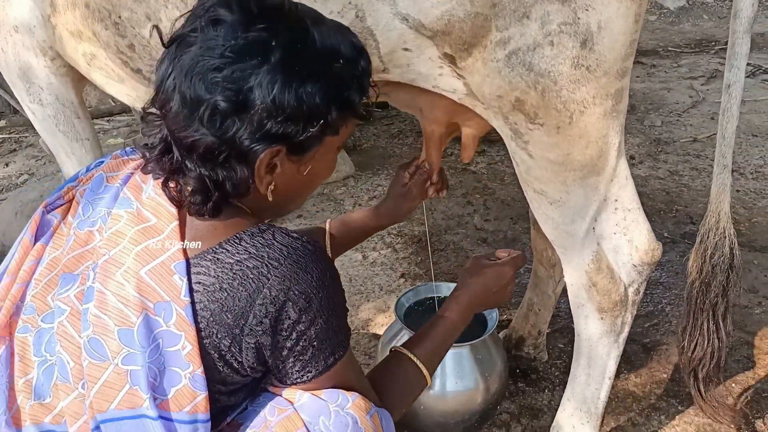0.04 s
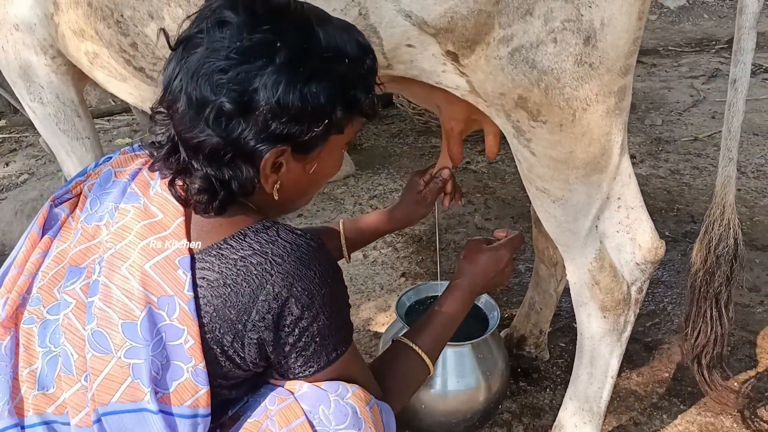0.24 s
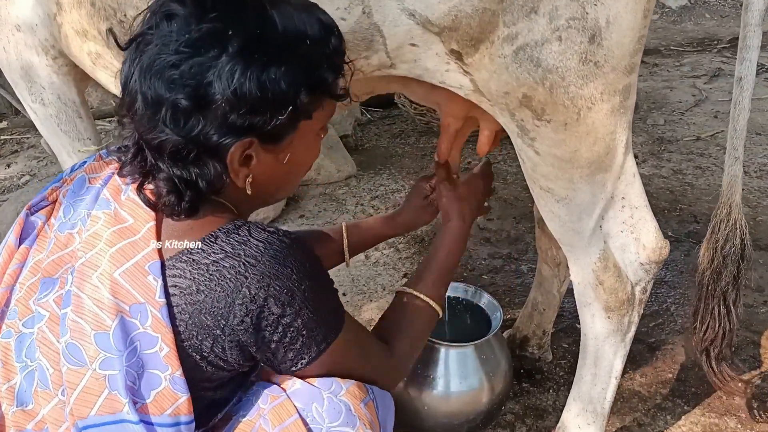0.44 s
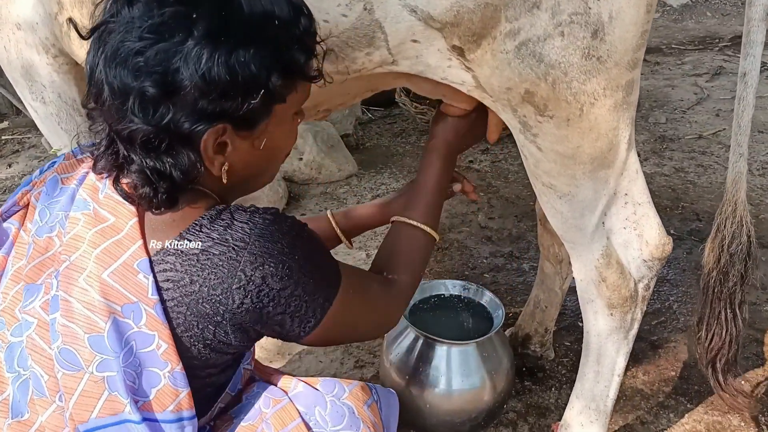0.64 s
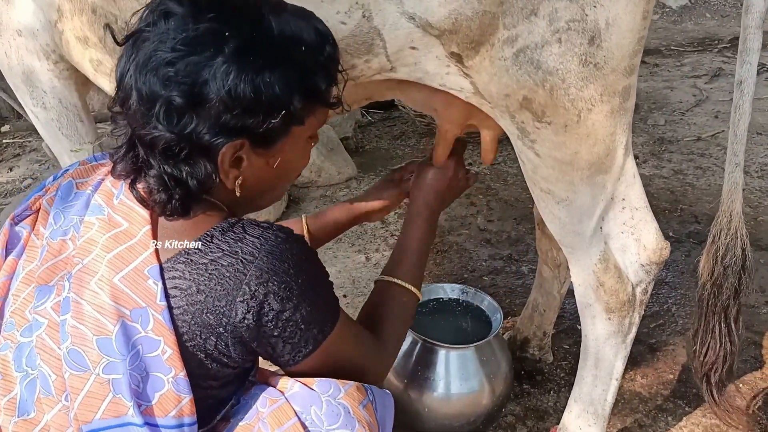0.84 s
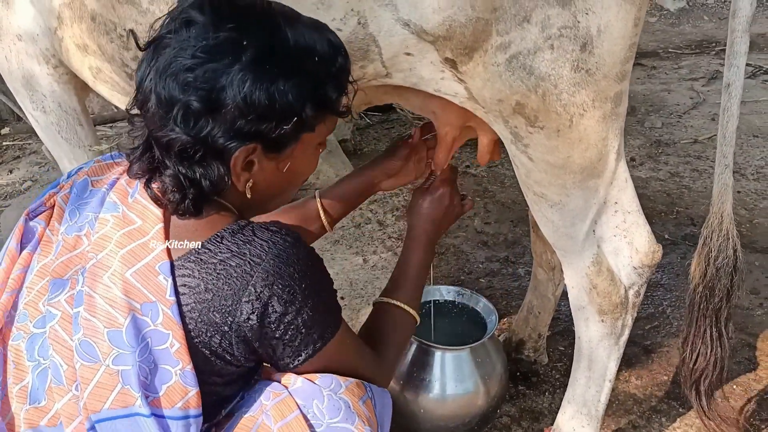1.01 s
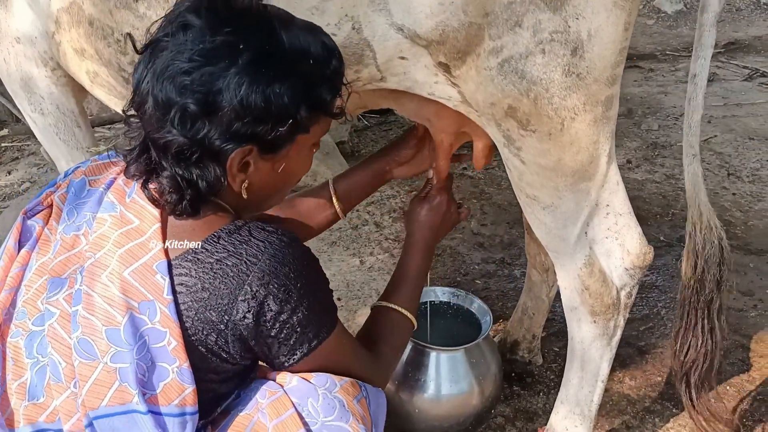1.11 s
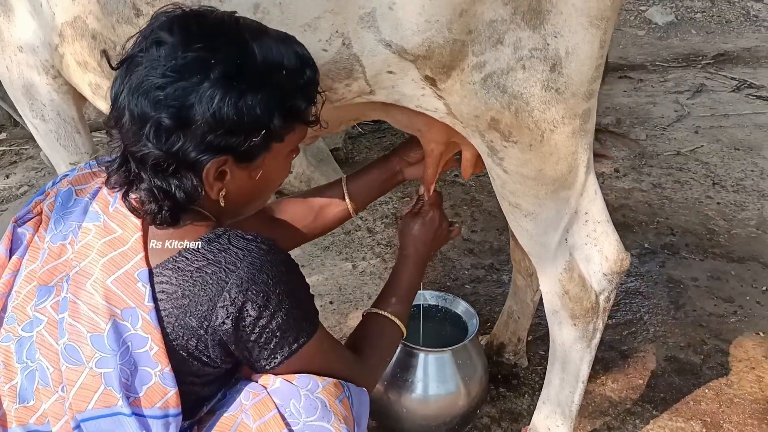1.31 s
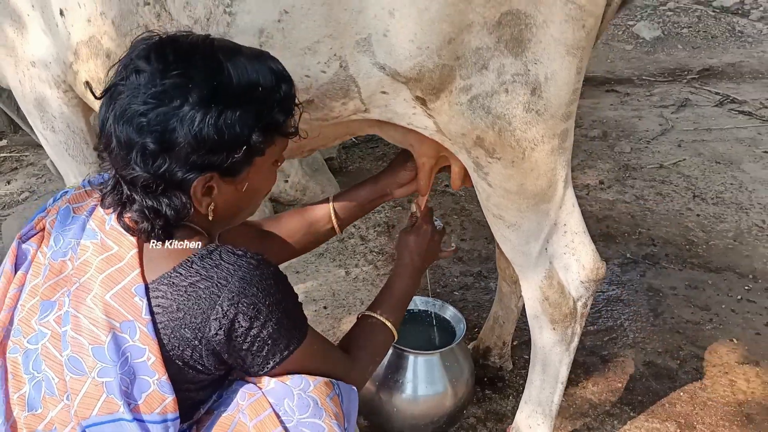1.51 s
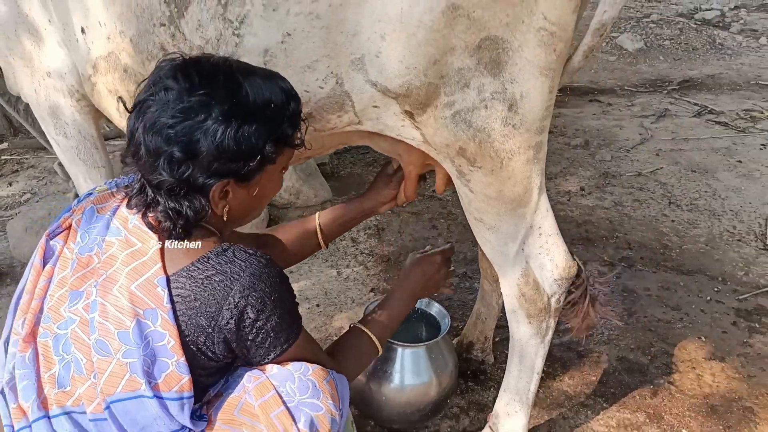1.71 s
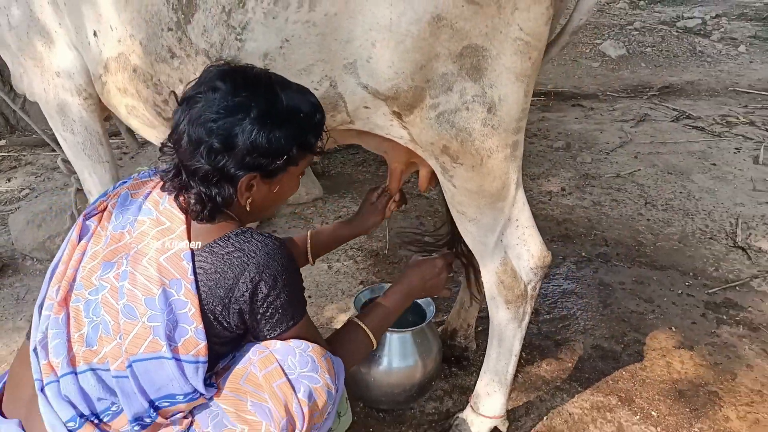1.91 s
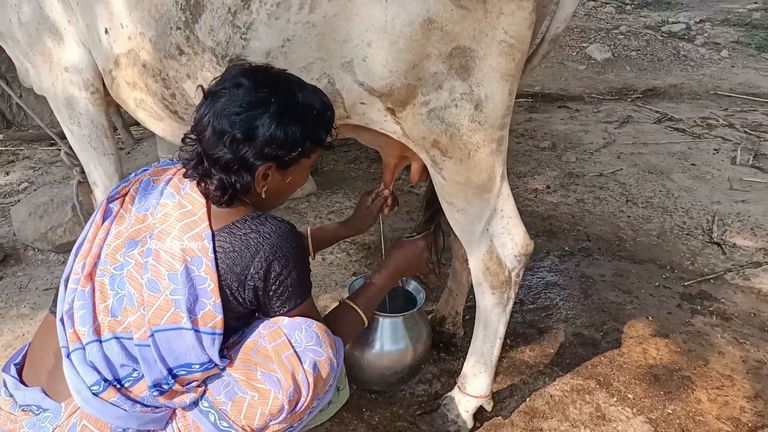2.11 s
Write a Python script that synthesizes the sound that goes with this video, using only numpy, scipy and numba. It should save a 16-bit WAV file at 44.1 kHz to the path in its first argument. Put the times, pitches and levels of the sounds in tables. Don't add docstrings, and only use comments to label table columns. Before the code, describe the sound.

Close stereo phone pickup outdoors: two bright metallic milk squirts with froth, splashing drops and a hollow hum, the first stronger. Bird whistles fill the gap and continue; faint chirps, soft wind and a quiet hush lie below.

```python
import sys
import numpy as np
from scipy import signal
from scipy.fft import rfft, irfft
from scipy.io import wavfile
from scipy.ndimage import uniform_filter1d
from numba import njit

SR = 44100
rng = np.random.default_rng(int(sys.argv[2]) if len(sys.argv) > 2 else 0)


def inscribe(sig):
    pcm = np.round(np.clip(np.atleast_2d(sig).T, -1, 1) * 32767)
    wavfile.write(sys.argv[1], SR, pcm.astype(np.int16))


def elevation(decibels):
    levels = np.asarray(decibels, float)
    return 10 ** (levels / 20)


N = 94815
LEFT_RIGHT = np.array([[1], [-1]])
JET_PAN_DB = 2.5


def unit(x):
    return x / np.sqrt(np.mean(x ** 2))


@njit
def svf(x, hz, width):
    y, b, l = np.empty(len(x)), 0., 0.
    g, k = np.tan(np.pi * hz / SR), width / hz
    for i in range(len(x)):
        v = (b + g * (x[i] - l)) / (1 + g * (g + k))
        b, l, y[i] = 2 * v - b, l + 2 * g * v, k * v
    return y


def walk(rate):
    k = int(SR / rate)
    steps = np.repeat(rng.standard_normal(N // k + 1), k)
    return unit(uniform_filter1d(uniform_filter1d(steps, k), k)[:N])


def column(table, index, off=-120.):
    a = np.array(table)
    return np.interp(np.arange(N) / SR, a[:, 0], a[:, index], left=off, right=off)


def over_pitch(table, **ends):
    a, f = np.array(table), np.arange(N // 2 + 1) * SR / N + 1
    return np.interp(np.log(f), np.log(a[:, 0]), a[:, 1], **ends)


def coloured(shape):
    return unit(irfft(rfft(rng.standard_normal(N)) * elevation(over_pitch(shape, left=-60)), N))


def glide(hz):
    return np.sin(2 * np.pi * np.cumsum(hz) / SR)


def pan(x, db):
    return x * elevation(.5 * LEFT_RIGHT * db)


def ring(drops, hz, width):
    hz, width = float(hz), 1.4 * width
    mid, side = (unit(svf(svf(d, hz, width), hz, width)) for d in drops)
    return mid + min(hz / 3500, .58) * side * LEFT_RIGHT


# t/s, level/dB, drop fineness/octaves above 1 kHz, spray/dB
SQUIRT_1 = [
    (.134, -60.5, 1.74, -0.5),
    (.142, -62.5, 2.534, 0),
    (.26, -49, 1.703, -6.5),
    (.37, -46, 1.425, -8),
    (.455, -47, 2.027, -1),
    (.463, -37, 1.052, -5),
    (.51, -46, 2.287, 1),
    (.655, -45, 2.568, 0.5),
    (.765, -65.5, 1.9, -1),
]
SQUIRT_2 = [
    (1.12, -83.5, 1.8, -1.5),
    (1.13, -59.5, 2.55, -3),
    (1.19, -57.5, 1.48, 5),
    (1.221, -41, 1.77, -2),
    (1.238, -52.5, 1.76, 0.5),
    (1.311, -53.5, 2.676, 9),
    (1.431, -50, 1.64, -1.5),
    (1.627, -59.5, 1.854, 1.5),
    (1.74, -75, 1.91, 5.5),
]
SQUIRT_3 = [
    (2.11, -89.5, 1.4, -10.5),
    (2.132, -61.5, 0.44, -0.5),
    (2.15, -59.5, 3.57, 5),
]
# f/Hz, width/Hz, level/dB
POT = [(1976, 258, -6.5), (2467, 442, -3.5), (2745.7, 398, -4.5), (3041, 384, 0.5), (3513.5, 376, -1.5),
       (4100, 346, -3), (4410, 346, -6), (5256, 416, -1), (6451, 1265, 2)]
# f/Hz, width/Hz, level/dB
SPRAY = [(8197, 895, -6.5), (8984, 1670, 1.5), (10150, 3460, 1.5), (11875, 2270, 6), (14310, 3900, 3.5)]


def jet():
    squirts = SQUIRT_1, SQUIRT_2, SQUIRT_3
    level = np.max([column(s, index=1) for s in squirts], axis=0)
    fine = sum(column(s, index=2, off=0.) for s in squirts)
    spray = sum(column(s, index=3, off=0.) for s in squirts)
    drops_per_s, scatter_db = 5000, 2.5
    lands = rng.random(N) < drops_per_s / SR
    size = lands * elevation(scatter_db * np.minimum(rng.exponential(size=N), 5))
    drops = size * np.sign(rng.standard_normal((2, N)))
    surge = 1.8 * walk(46.04)

    body, power = 0, 0
    for k, (hz, width, db) in enumerate(POT):
        octaves_off = np.log2(hz / 1000) - fine
        weight = elevation(db) * (np.exp(-.5 * (octaves_off / .7) ** 2) + elevation(-15))
        flutter = elevation(3 * walk(59.79) + 1.5 * walk(11.53))
        body = body + (-1) ** k * weight * flutter * ring(drops, hz, width)
        power = power + weight ** 2
    body = body / np.sqrt(power)

    hiss, hiss_surge = 0, elevation(1.65 * walk(49.906))
    for hz, width, db in SPRAY:
        flutter = elevation(db + 3.23 * walk(59.81) + 1.74 * walk(14))
        mist = rng.standard_normal((2, N)) * (1 + 1.02 * unit(size))
        hiss = hiss + flutter * ring(mist, hz, width)
    hiss = hiss_surge * unit(hiss)
    return pan(elevation(level + surge - 3) * (body + elevation(spray) * hiss), JET_PAN_DB)


# t/s, level/dB
FROTH_1 = [(.135, -73.5), (.18, -60.5), (.24, -52.5), (.3, -52), (.45, -56), (.47, -49), (.52, -58),
           (.63, -62.5), (.72, -97)]
FROTH_2 = [(1.148, -71), (1.18, -57), (1.222, -42.5), (1.243, -61), (1.256, -46.5), (1.391, -46),
           (1.431, -44), (1.634, -58), (1.696, -90)]
FROTH_3 = [(2.115, -84.5), (2.133, -63), (2.15, -61)]
# f/Hz, width/Hz, level/dB
CAVITY = [(820, 160, -8), (1070, 240, 0), (1300, 200, -5), (1520, 220, 0), (1720, 160, -4)]


def froth():
    level = np.max([column(f, index=1) for f in (FROTH_1, FROTH_2, FROTH_3)], axis=0)
    bubbles_per_s, scatter_db = 1400, 3
    air = 0
    for hz, width, db in CAVITY:
        flutter = elevation(db + 1.503 * walk(29.727))
        bursts = rng.random(N) < bubbles_per_s / SR
        size = elevation(scatter_db * np.tanh(rng.exponential(size=N) / 2) * 2)
        pops = bursts * size * rng.standard_normal((2, N))
        air = air + flutter * ring(pops, hz, width)
    return pan(elevation(level) * unit(air), JET_PAN_DB + .3)


# t/s, peak level/dB, ring f/Hz, crack level/dB, length/ms
SPLASH = [(0.221, -26.5, 3015, -6.5, 2.21), (0.2196, -36.5, 5010, -4, 3.42),
          (0.2207, -36, 1194, -4.5, 2.19), (0.271, -36.5, 3830, -31, 3.53), (0.319, -42, 2860, -26.5, 10.4),
          (0.374, -35, 3750, -16.5, 5.7), (0.458, -44, 2700, -20.5, 3.7), (0.46, -35.5, 4400, -13.5, 5),
          (0.476, -36, 2770, -20, 16.8), (0.496, -35, 3700, -13, 3.03), (.6625, -34, 6214, -2, 2.15),
          (0.7403, -32, 3234, 7, 1.6), (1.206, -40, 6000, -8, 3.06), (1.212, -33, 2640, -19, 5.2),
          (1.2221, -24, 900, 3, 1.08), (1.354, -44.5, 3180, -27, 7.5), (.282, -32.5, 1129, -11.5, 4.3),
          (0.2, -43, 1048, -15.5, 3.74), (1.254, -36, 1082, 6, 3), (1.2994, -40, 1497, -22.5, 3.6),
          (1.6, -38, 1450, -19.5, 1.67), (1.4087, -37.5, 1497, -9, 6.05), (1.4172, -41.5, 1090, -20, 7.1),
          (1.4631, -35.5, 1370, -26, 5.9), (1.1867, -45.5, 1000, 10.5, 3.4), (1.5858, -53.5, 3500, 15, 3),
          (1.318, -33, 1493, -13.5, 3.7), (0.85, -53.5, 4400, -0.5, 2.75), (.566, -41.5, 4100, -1, 2.5),
          (0.55, -35.5, 5680, 1.5, 2.33), (1.704, -46, 5824, -5.5, 4.74), (1.6, -55, 1070, 11, 4.8)]


def splashes():
    size = 2048
    out, t = np.zeros((2, N + size)), np.arange(size) / SR
    for s, db, hz, crack_db, ms in SPLASH:
        noise = rng.standard_normal((2, size))
        both = noise[0] + .5 * noise[1] * LEFT_RIGHT
        hz = float(hz)
        tone = np.array([unit(svf(svf(n, hz, hz / 4.5), hz, hz / 2)) for n in both])
        middle = np.array([svf(n, 290.0, 1730.0) for n in both])
        crack = (both - middle) * np.exp(-t / .0015)
        fade = np.exp(-t * 1000 / ms) * (1 - np.exp(-t / .00029))
        i = int(s * SR)
        out[:, i:i + size] += elevation(db + 1) * fade * (tone + elevation(crack_db) * crack)
    return pan(out[:, :N], JET_PAN_DB)


def wall(x):
    t60_s, tail_gain = .06, elevation(-5)
    age = np.arange(SR // 10) / SR
    tail = rng.standard_normal(len(age)) * elevation(-60 * age / t60_s)
    tail = tail / np.sqrt(np.sum(tail ** 2))
    ringing = signal.fftconvolve(x, tail[None], axes=1)[:, :N]
    return (x + tail_gain * ringing) / np.hypot(1, tail_gain)


# t/s, hum level/dB
HUM_1 = [(.26, -74), (.35, -46), (.39, -61), (.435, -45.5), (.48, -54.5), (.52, -46), (.62, -49.5),
         (.715, -52), (.79, -74)]
HUM_2 = [(1.32, -71.5), (1.36, -51.5), (1.41, -48), (1.52, -46), (1.56, -52), (1.578, -41.5),
         (1.635, -46.5), (1.67, -53.5), (1.76, -75.5)]


def neck():
    hz, width = 300.72, 35.0
    noise = rng.standard_normal((2, N))
    tone = np.sqrt(2) * glide(hz * (1 + .035 * walk(40.15))) * elevation(1.8 * walk(50))
    rough = elevation(-4) * unit(svf(noise[0], hz, width))
    skirt = elevation(-18.5) * unit(svf(noise[1], 300.0, 115.0))
    side = .124 * unit(svf(noise[1], 296.0, 140.0)) * LEFT_RIGHT
    level = np.maximum(column(HUM_1, index=1), column(HUM_2, index=1))
    return elevation(level) * (tone + rough + skirt + side)


# t/s, peak level/dB, f/Hz
KNOCKS = [(.136, -52.5, 304.3), (.228, -46, 442), (1.252, -54, 325.8), (.53, -48, 444.9), (.56, -53, 191.8),
          (.65, -54, 624), (.258, -50, 590.4), (0.282, -54, 307.4), (.455, -54.5, 780), (1.195, -55, 518.5),
          (1.225, -43.5, 598.2), (1.299, -54.5, 398.7), (.875, -62, 235.3), (.938, -61, 230.6),
          (1.165, -55, 502), (1.17, -51, 633), (1.18, -48, 234.5), (1.26, -46.5, 458),
          (1.791, -52.5, 239.3), (1.848, -58.5, 216.5)]


def knocks():
    t, out = np.arange(N) / SR, 0
    for s, db, hz in KNOCKS:
        age = np.maximum(t - s, 0)
        fall_db = 60 * age * hz / 33.52
        level = elevation(db + 5.5 + 4.62 * walk(70.224) - fall_db)
        out = out + level * np.minimum(age * 130, 1) * np.sin(2 * np.pi * hz * age)
    return out


# t/s from its top, f/Hz, level/dB
WHISTLE = [
    (-.125, 2200, -9),
    (-.105, 1990, -7),
    (-.082, 2080, -15),
    (-.048, 2650, -9),
    (-.028, 3050, -8),
    (-.014, 3850, 0),
    (0, 4600, -3),
    (.011, 4450, -14),
]
# t/s of top, level/dB, time stretch, lead-in level/dB
BIRD = [
    (.835, -48, .85, -9),
    (1.196, -52, 1.02, -6),
    (1.533, -49, .9, -30),
    (1.858, -52, .98, -3),
    (2.195, -56, .98, -8),
]


def bird():
    t, out = np.arange(N) / SR, 0
    shape = np.array(WHISTLE)
    for s, db, stretch, lead_db in BIRD:
        at = s + shape[:, 0] * stretch
        hz = uniform_filter1d(np.interp(t, at, shape[:, 1]), size=300)
        level = db + np.interp(t, at, shape[:, 2], left=-90, right=-90)
        lead_in = np.interp(t, [s - .085, s - .025], [lead_db, 0])
        throb = 2.5 * np.tanh(walk(110))
        out = out + uniform_filter1d(elevation(level + lead_in + throb), size=100) * glide(hz)
    return out


# start t/s, length/s, from f/Hz, to f/Hz, level/dB
FAR_BIRD = [
    (1.02, .05, 2000, 2150, -76),
    (1.755, .065, 2150, 3050, -68),
    (.83, .035, 2450, 2450, -73),
    (.745, .05, 3480, 3500, -72),
    (1.9, .08, 2700, 2800, -76),
]


def far_bird():
    t, out = np.arange(N) / SR, 0
    for s, length, from_hz, to_hz, db in FAR_BIRD:
        u = np.clip((t - s) / length, 0, 1)
        hz = (from_hz + (to_hz - from_hz) * np.sqrt(u)) * (1 + .0218 * walk(200))
        out = out + elevation(db + 2.5 * walk(120)) * np.sin(np.pi * u) * glide(hz)
    return out


# delay t/s, left level/dB, right level/dB
SLAPS = [
    (.011, -12, -16),
    (.021, -16, -12),
    (.039, -23, -26),
]


def yard_echo(x):
    echo_db, t60_s = -7, .3
    age = np.arange(SR // 3) / SR
    tail = rng.standard_normal((2, len(age))) * elevation(-60 * age / t60_s) * (age > .004)
    tail = tail / np.sqrt(np.sum(tail ** 2) / 2)
    for s, left_db, right_db in SLAPS:
        tail[:, int(s * SR)] += elevation(np.array([left_db, right_db]) - echo_db)
    echo = signal.fftconvolve(x[None], tail, axes=1)[:, :N]
    return pan(x + elevation(echo_db) * echo, 3)


# t/s, level/dB
GUST = [(0, -66), (.13, -58), (.3, -61.5), (.48, -52.5), (.62, -62), (.68, -65), (.78, -52), (.9, -56),
        (1.03, -64.5), (1.08, -58.5), (1.18, -67.5), (1.27, -46.5), (1.6, -69.5), (1.85, -57), (2.05, -76),
        (2.12, -55.5)]
# f/Hz, level/dB
WIND = [(12, -71), (20, -2), (50, 3.5), (113, -11), (156, -18.5), (220, -23.5), (290, -52), (480, -120)]


def wind():
    puffs = np.array([coloured(WIND) * elevation(.467 * walk(11)) for _ in range(2)])
    return pan(elevation(column(GUST, index=1) + 3) * puffs, 8)


# f/Hz, level/dB
YARD = [(88, -17.5), (150, -6), (253, -6.5), (656, -20), (1150, -26), (1270, -29), (2700, -21.5),
        (2980, -24), (15500, -33.5)]
# t/s, level/dB
HUSH = [(.75, 3), (1.1, 0), (1.75, 3.5), (1.96, 4), (2.0, -4), (2.15, 2)]


def yard():
    mid, side = coloured(YARD), coloured(YARD)
    side = side - .54 * svf(side, 210.0, 830.0)
    return elevation(-70 + column(HUSH, index=1, off=0.)) * (mid + 1.12 * side * LEFT_RIGHT)


# f/Hz, phase/rad
PORTS = [(1400, 0.15), (2500, 0.366), (4200, -0.88), (5700, -1.334), (9000, 0.24), (13000, 1.16)]


def ports(x):
    return irfft(rfft(x) * np.exp(.5j * over_pitch(PORTS) * LEFT_RIGHT), N)


def scene():
    pot = wall(jet() + froth() + .632 * splashes()) + .5 * splashes()
    birds = yard_echo(bird() + far_bird())
    return ports(pot + birds) + neck() + knocks() + wind() + yard()


def roll_off(x):
    return signal.sosfilt(signal.butter(12, 16340, fs=SR, output="sos"), x)


def record(dry):
    low_pass = signal.ellip(12, .2, 60, 15600, fs=SR, output="sos")
    mix = signal.sosfilt(low_pass, dry)
    return roll_off(mix)


dry = scene()
out = record(dry)
inscribe(out)
```